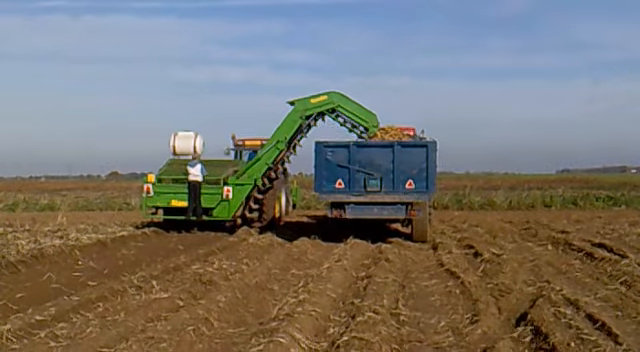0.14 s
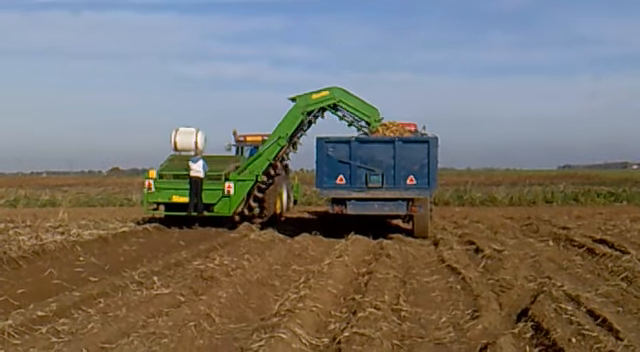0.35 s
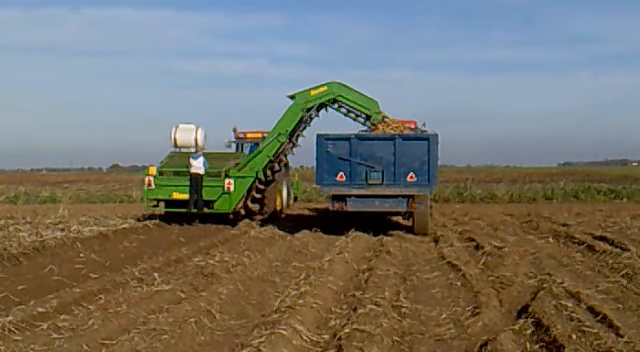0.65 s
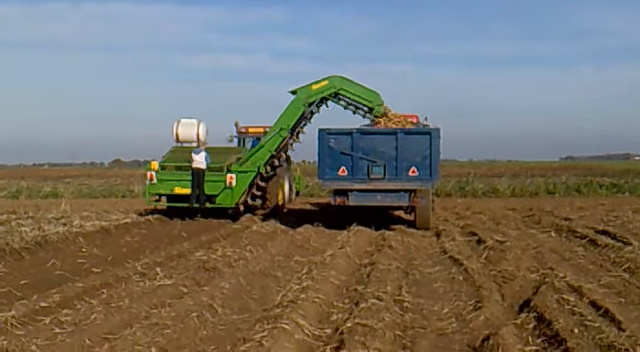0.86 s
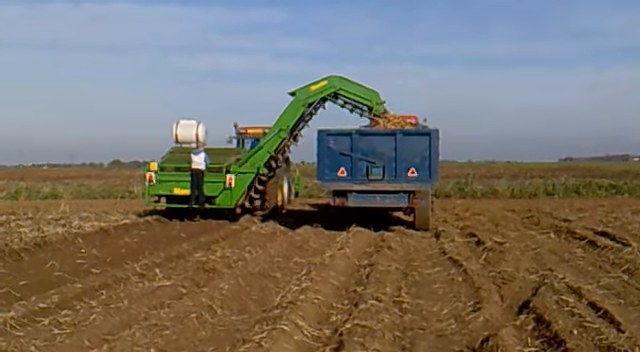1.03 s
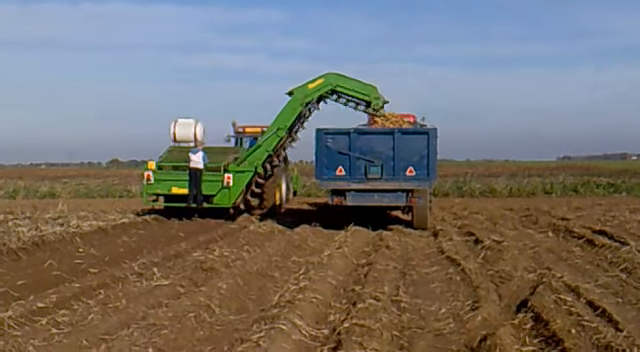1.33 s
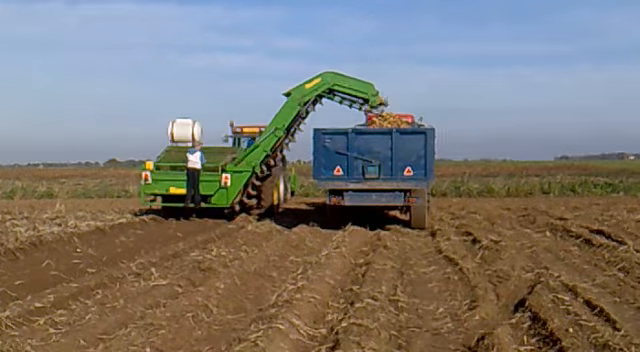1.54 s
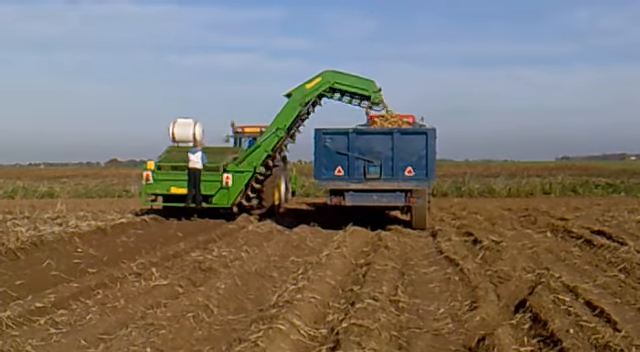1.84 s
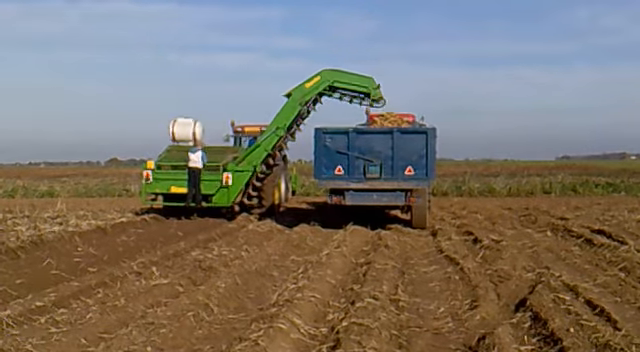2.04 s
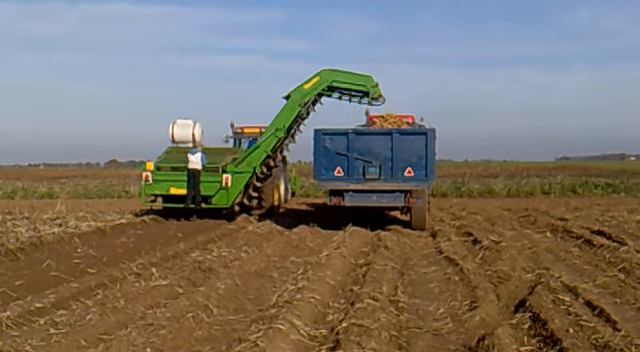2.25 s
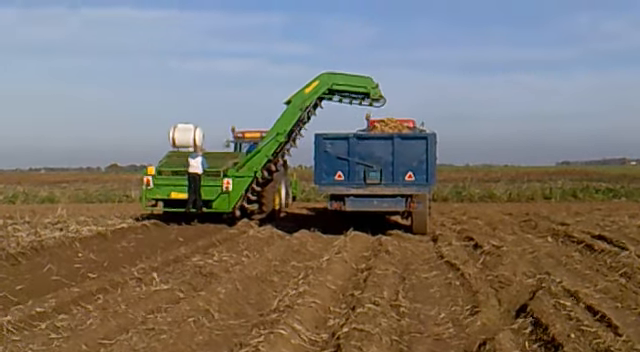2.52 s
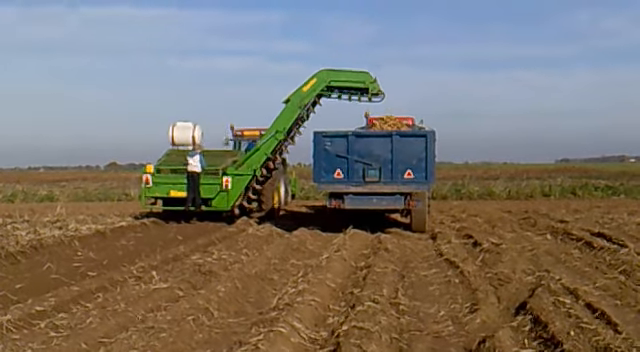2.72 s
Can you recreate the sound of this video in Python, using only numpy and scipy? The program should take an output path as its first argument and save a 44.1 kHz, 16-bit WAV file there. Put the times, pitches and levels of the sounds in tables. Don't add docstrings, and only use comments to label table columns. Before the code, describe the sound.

Distant diesel tractor and rattling harvester chain in an open field, under heavy distorting wind thumps

```python
import sys
import numpy as np
from scipy import signal
from scipy.fft import rfft, irfft, next_fast_len
from scipy.io import wavfile
from scipy.ndimage import uniform_filter1d, map_coordinates

SR = 44100
rng = np.random.default_rng(int(sys.argv[2]) if len(sys.argv) > 2 else 0)


def file_out(sig):
    cols = np.atleast_2d(sig).T
    lim = np.clip(cols, -1, 1)
    pcm = np.round(lim * 32767).astype(np.int16)
    wavfile.write(sys.argv[1], SR, pcm)


def elevation(decibels):
    levels = np.asarray(decibels, float)
    return 10 ** (levels / 20)


N = 127008

# start_s, level_db
CHAIN_LOAD = [(0, 1), (.6, -1), (1.1, 1), (1.7, 2.5), (1.88, 4.5), (1.95, 1.5), (2.03, 12.5), (2.09, 2),
              (2.15, 6.5), (2.25, 4.5), (2.4, 2), (2.6, 2.5), (2.88, 2.5)]


def unit(x):
    return x / np.sqrt(np.mean(x ** 2) + 1e-20)


def curves(rows):
    s, *cols = np.transpose(rows)
    return [np.interp(np.arange(N) / SR, s, c) for c in cols]


def wobble(rate):
    return map_coordinates(rng.standard_normal(N // 100), [np.arange(N) * rate / SR])


def filtered(x, response):
    m = next_fast_len(N + SR // 2)
    return irfft(rfft(x, m) * response(np.fft.rfftfreq(m, 1 / SR)), m)[:N]


def coloured(x, points):
    f, v = np.transpose(points)
    return unit(filtered(x, lambda hz: elevation(np.interp(np.log(hz + 1), np.log(f + 1), v))))


def patchy(patchy_db):
    z = signal.stft(rng.standard_normal(N + 512), nperseg=512)[2]
    field = rng.standard_normal(z.shape)
    field = uniform_filter1d(uniform_filter1d(field, 6, 0), 10, 1)
    return signal.istft(z * elevation(patchy_db * unit(field)), nperseg=512)[1][:N]


def eddies(vortices, points, lump_db):
    even_share, even_s, noise_between = 0.7, 0.025, 0.93
    x = coloured(vortices + noise_between * rng.standard_normal(N), points)
    width = round(even_s * SR)
    power = uniform_filter1d(uniform_filter1d(x ** 2, width), width)
    level = np.sqrt(np.abs(power) + 0.01)
    return unit(x * level ** -even_share * elevation(lump_db))


def gusts():
    # start_s, strength_db, brightness_db of the finer eddies
    slow_wind = [(0, -17.5, -12.5), (.19, -30, -11.5), (.25, -23.5, -7), (.4, -24, -15.5), (.6, -28.5, -11),
                 (.69, -31.5, -19), (.95, -33.5, -11.5), (1.1, -30, -10), (1.39, -26.5, -10.5),
                 (1.48, -31, -19), (1.68, -34, -25), (1.86, -28.5, -14.5), (2.03, -23.5, -13),
                 (2.2, -25, 0.5), (2.26, -27, -7), (2.48, -25.5, 7.5), (2.6, -33, 8.5), (2.88, -38.5, 13.5)]
    # start_s, strength_db, length_s, brightness_db
    fronts = [(.01, -26.5, 0.14, -2), (0.27, -17.5, 0.055, -4.5), (0.43, -11.5, 0.011, 12.5),
              (0.46, -12.5, 0.044, -5), (0.498, -15, 0.071, -7.5), (0.56, -15.5, 0.034, -21),
              (0.608, -22.5, 0.032, 4), (0.726, -26.5, 0.098, -11.5), (0.794, -31.5, 0.05, 5),
              (0.882, -24.5, 0.043, 3.5), (0.932, -13.5, 0.024, -17.5), (0.975, -24, 0.048, -7),
              (1.04, -36, 0.023, 1), (1.172, -34, 0.016, 0), (1.21, -26.5, 0.095, -10),
              (1.279, -24.5, 0.058, -7.5), (1.502, -17.5, 0.011, 1), (1.687, -30, 0.025, -15),
              (1.755, -23, 0.032, -22), (1.799, -35, 0.029, 3.5), (1.878, -23, 0.024, -6),
              (1.913, -13.5, 0.067, -9.5), (2.077, -11.5, 0.065, -10.5), (2.111, -10.5, 0.033, -11),
              (2.141, -9.5, 0.03, -15), (2.177, -25.5, 0.028, 2), (2.269, -18.5, 0.026, 1.5),
              (2.289, -21, 0.036, 5), (2.324, -14.5, 0.044, 8.5), (2.345, -22, 0.035, -5.5),
              (2.394, -22.5, 0.055, 4), (2.725, -22.5, 0.023, 7), (2.831, -40, 0.17, 17.5)]
    rise_s = 0.0084
    strength_db, bright_db = curves(slow_wind)
    t = np.arange(N) / SR
    big = elevation(2 * strength_db)
    fine = elevation(2 * (strength_db + bright_db))
    for s, db, length, fine_db in fronts:
        u = np.maximum(t - s, 0)
        front = ((1 - np.exp(-u / rise_s)) * np.exp(-(u / length) ** 2)) ** 2
        big = big + elevation(2 * db) * front
        fine = fine + elevation(2 * (db + fine_db)) * front
    return big, fine


def diaphragm_kicks():
    # start_s (at the peak), level_db, sign, width_s
    kick_rows = [(0.292, -3, -1, 0.0017), (0.433, -11, 1, 0.0013), (.437, 0.5, -1, .0013),
                 (0.4542, -4.5, 1, 0.00075), (0.4569, -0.5, -1, 0.002), (0.4625, 3, 1, 0.0011),
                 (0.4729, -7, 1, 0.0013), (0.491, -6, 1, .0015), (0.5169, -2.5, -1, .0025),
                 (.5238, -6, 1, 0.0017), (.527, -7, -1, 0.001), (.614, -15.5, -1, 0.00068),
                 (0.884, -12, -1, 0.00073), (0.904, -9.5, -1, 0.00062), (0.989, -10, -1, 0.002),
                 (1.217, -10, 1, 0.0017), (1.51, -12, -1, 0.0018), (1.712, -10.5, -1, 0.0023),
                 (1.771, -9.5, -1, 0.0027), (1.937, -4.5, -1, 0.0015), (1.951, 1, 1, 0.0013),
                 (2.1007, 1, -1, 0.0017), (2.123, -6.5, -1, 0.0014), (2.152, -12, -1, 0.00097),
                 (2.29, -11, 1, 0.0014), (2.3, -5.5, -1, 0.0011), (2.309, -6, 1, 0.001),
                 (2.3312, -11, -1, 0.00087), (2.338, -5.5, 1, 0.00076), (2.3413, 0, -1, 0.0011),
                 (2.345, -0.5, -1, 0.00062), (2.3471, -1, 1, 0.00084), (2.348, -0.5, -1, 0.00086),
                 (2.3651, -2.5, -1, 0.002), (2.374, -4, 1, 0.001), (2.385, -6, -1, 0.001),
                 (2.426, -4.5, 1, 0.0016), (2.467, -9.5, -1, 0.00079), (2.443, -4.5, 1, 0.00079)]
    low_hz, duck_share, duck_reach = 25, 0.9, 3
    t = np.arange(N) / SR
    kicks, duck = np.zeros(N), np.ones(N)
    for s, db, way, width in kick_rows:
        kicks += np.sign(way) * elevation(db) * np.exp(-((t - s) / width) ** 2)
        duck *= 1 - duck_share * np.exp(-((t - s) / (duck_reach * width)) ** 2)
    kicks = filtered(kicks, lambda f: (1j * f / (low_hz + 1j * f)) ** 2)
    return kicks, duck


def wind():
    # pitch_hz, level_db
    big_spectrum = [(12, -60), (28, -10.5), (60, -2), (135, -0.5), (190, -6), (340, -22.5), (430, -45),
                    (1500, -85)]
    # pitch_hz, level_db
    fine_spectrum = [(60, -3.5), (150, -6.5), (300, 2.5), (380, -4), (600, -15), (1000, -31), (1800, -55.5),
                     (4000, -92)]
    vortices_per_s, vortex_db = 190, 3
    big_lump_db, fine_lump_db = 1.9, 1.04
    big_power, fine_power = gusts()
    shared = wobble(30.01)
    rate = vortices_per_s * 2 * rng.random(N) * elevation(4 * wobble(200))
    passing = np.diff(np.floor(np.cumsum(rate / SR)), prepend=0)
    sign = np.sign(rng.standard_normal(N))
    vortices = unit(passing * sign * elevation(vortex_db * rng.standard_normal(N)))
    big = eddies(vortices, big_spectrum, big_lump_db * (0.58 * shared + wobble(12.96)))
    fine = eddies(vortices, fine_spectrum, fine_lump_db * (shared + 1.3 * wobble(70)))
    kicks, duck = diaphragm_kicks()
    return duck * (np.sqrt(big_power) * big + np.sqrt(fine_power) * fine) + kicks


def exhaust_drone(turn):
    # pitch_hz, width_hz, level_db
    resonances = [
        (74.3, 15.4, 2.5),
        (135.2, 11.2, 1),
        (250.5, 25, -6.5),
    ]
    firings = np.diff(np.floor(turn), prepend=0) * elevation(6.6 * rng.standard_normal(N))
    source = unit(firings) + rng.standard_normal(N)

    def body(f):
        return sum((-1) ** k * elevation(db) * 1j * f * w / (c * c - f * f + 1j * f * w)
                   for k, (c, w, db) in enumerate(resonances))

    drone = filtered(source, body)
    return elevation(-34) * unit(filtered(drone, lambda f: 1 / (1 + (f / 330) ** 6)))


def engine_roar(turn):
    # pitch_hz, level_db
    block_spectrum = [(250, -46), (440, -10.5), (620, 1), (1150, -9), (1500, -3), (1700, -7.5), (1850, -20),
                      (2600, -34.5)]
    gate_share, load_share = 0.25, 0.62
    gate = 1 - gate_share + gate_share * 2 * np.exp(-3 * (turn % 1))
    roar = coloured(patchy(patchy_db=1.5) * gate, block_spectrum)
    return elevation(-46.5 + load_share * curves(CHAIN_LOAD)[0]) * roar


def gear_whine():
    # pitch_hz, level_db
    tones = [(1652, -57), (2062, -66.5), (2439, -80), (2783, -73.5), (4107, -75), (4657, -81)]
    drift = 0.00215
    shaft = 2 * np.pi * np.cumsum(1 + drift * wobble(7.7)) / SR
    return sum(np.sqrt(2) * elevation(db + 0.77 * wobble(15)) * np.sin(hz * shaft) for hz, db in tones)


def tractor():
    firing_hz, jitter = 36.16, 0.043
    turn = np.cumsum(firing_hz * (1 + jitter * wobble(27))) / SR
    return exhaust_drone(turn) + engine_roar(turn) + gear_whine()


def sieve_rattle():
    # pitch_hz, level_db
    rattle_spectrum = [(1700, -13), (2100, 1), (2500, -9.5), (3500, -9), (4900, -10.5), (5300, -17),
                       (6900, -19.5), (7700, -32)]
    # pitch_hz, width_hz, level_db
    plates = [(2080, 260, 1), (2740, 260, 2), (4050, 330, 1.5), (4600, 310, 3)]
    grains = patchy(patchy_db=1.0) * elevation(0.92 * wobble(150) + 0.29 * wobble(8.1))
    grains = filtered(grains, lambda f: elevation(sum(db * np.exp(-((f - hz) / width) ** 2)
                                                for hz, width, db in plates)))
    return elevation(-54.5 + curves(CHAIN_LOAD)[0]) * coloured(grains, rattle_spectrum)


def knock(out_s, db, hz, t60, octaves, rise_s=0.001):
    t, f = np.arange(6000) / SR, np.fft.rfftfreq(6000, 1 / SR)
    sparse = rng.standard_normal(len(t)) ** 3
    band = np.exp(-(np.log2(f / hz + 1e-6) / octaves) ** 4 / 2)
    burst = unit(irfft(rfft(sparse) * band))
    x = np.zeros(N + SR)
    x[round(out_s * SR):][:len(t)] = elevation(db - 60 * t / t60) * burst * (1 - np.exp(-t / rise_s))
    return x[:N]


def chain_rods():
    # start_s, level_db
    openness = [
        (0, -3),
        (1.302, -19),
        (2.0, -4),
        (2.4, -2.5),
        (2.88, 10.5),
    ]
    rate_hz, first_s = 15.33, 0.053
    near_s, near_db = np.transpose(openness)
    rods = np.zeros(N)
    for s in first_s + np.arange(44) / rate_hz:
        late, louder, higher = rng.standard_normal(3)
        db = -54.5 + np.interp(s, near_s, near_db) + 2.0 * louder
        hz = 6000 * np.exp(0.1 * higher)
        rods += knock(abs(s + 0.0024 * late), db, hz, t60=0.061, octaves=0.36, rise_s=0.005)
    return rods


def stone_clacks():
    # start_s, level_db (peak), pitch_hz, t60_s, band_octaves
    strikes = [(0.422, -67, 4700, 0.04, .08), (.566, -50, 5100, 0.12, 0.44), (.778, -46, 2090, 0.11, 0.12),
               (0.936, -47, 5500, 0.022, 0.28), (.953, -42, 3900, 0.06, 0.56),
               (1.369, -44, 4760, 0.049, .08), (1.562, -56.5, 7500, 0.064, 0.44),
               (1.922, -53.5, 4840, .2, 0.061), (1.952, -43.5, 3940, 0.044, .2),
               (1.996, -40, 4200, 0.13, .15), (1.998, -40, 2660, .1, 0.14), (1.999, -45, 6200, .06, .1),
               (1.999, -49, 9000, 0.054, 0.21), (2.017, -37, 1810, 0.16, 0.72),
               (2.016, -41.5, 4600, 0.16, 0.24), (2.017, -53, 6200, .1, 0.19),
               (2.055, -52, 4740, 0.14, 0.11), (2.015, -52, 9240, 0.059, 0.27),
               (2.124, -48.5, 4680, 0.21, 0.25), (2.131, -43, 1430, 0.32, 0.1),
               (2.15, -55.5, 8750, 0.055, .1), (2.401, -45, 6400, 0.038, 0.088),
               (2.008, -43, 2670, 0.12, .2), (2.411, -50, 4050, 0.11, 0.086), (2.466, -52, 4050, .07, .08),
               (2.718, -44, 4830, 0.057, 0.059), (2.73, -55, 6200, 0.038, .06)]
    return sum(knock(s, db, hz, t60, octaves) for s, db, hz, t60, octaves in strikes)


def stone_snaps():
    # start_s (at the centre), level_db (peak), pitch_hz, width_s
    contacts = [(.5675, -44, 5670, .0007), (.5685, -43, 4500, 0.00089), (.574, -45, 4800, 0.00072),
                (.58, -46, 4800, .0008), (.9385, -40, 5400, .0002), (.95, -34, 4400, .00025),
                (.9545, -32, 5130, 0.00021), (.957, -39, 3500, .0008), (0.961, -44, 4200, .0006),
                (1.9543, -38, 3500, 0.00043), (2.001, -45, 8500, .0002), (2.006, -32, 4150, .0012),
                (2.016, -34, 6000, 0.00011), (2.022, -42, 2580, 0.00062), (2.027, -33, 4840, 0.00087),
                (2.034, -35, 4630, .001), (2.134, -41, 5100, 0.00045), (2.35, -43, 4600, 0.00038)]
    t = np.arange(N) / SR
    return sum(elevation(db) * np.exp(-((t - s) / width) ** 2) * np.sin(2 * np.pi * hz * (t - s))
               for s, db, hz, width in contacts)


def harvester():
    return sieve_rattle() + chain_rods() + stone_clacks() + stone_snaps()


def scene():
    return (wind() + tractor() + harvester())[None]


def roll_off(x):
    return signal.sosfilt(signal.butter(12, 16650, fs=SR, output="sos"), x)


def record(dry):
    # pitch_hz, level_db
    hiss_spectrum = [(1000, -27), (5000, 6.5), (8000, -17.5), (11000, -27), (15500, -1)]
    quiet = elevation(-21.5)
    open_share, open_s, open_hz, hiss_open = 0.62, 0.039, 830, 0.1
    clip_top, clip_hard, top_hz = 0.71, 12, 15720
    power = uniform_filter1d(dry[0] ** 2, round(open_s * SR))
    loudness = np.sqrt(np.abs(power) + quiet ** 2 / 2) / quiet
    hiss = elevation(-63) * coloured(rng.standard_normal(N), hiss_spectrum)
    x = dry[0] + hiss * loudness ** hiss_open
    treble = filtered(x, lambda f: 1 / (1 + (open_hz / (f + 1)) ** 4))
    x = x + treble * (loudness ** open_share - 1)
    x = x / (1 + np.abs(x / clip_top) ** clip_hard) ** (1 / clip_hard)
    mix = filtered(x, lambda f: f < top_hz)[None]
    return roll_off(mix)


dry = scene()
out = record(dry)
file_out(out)
```